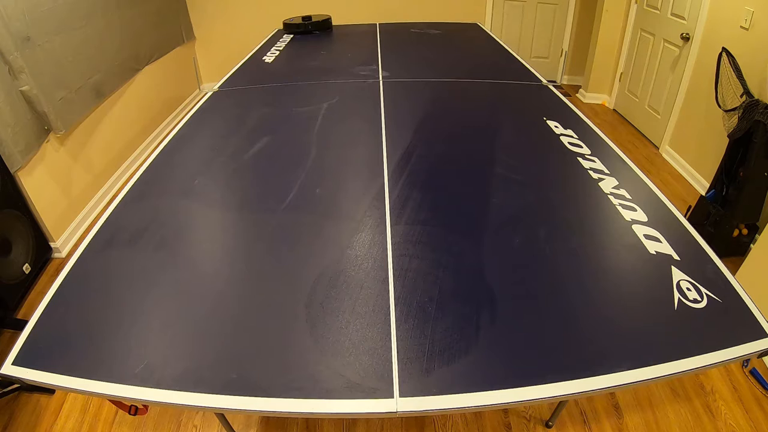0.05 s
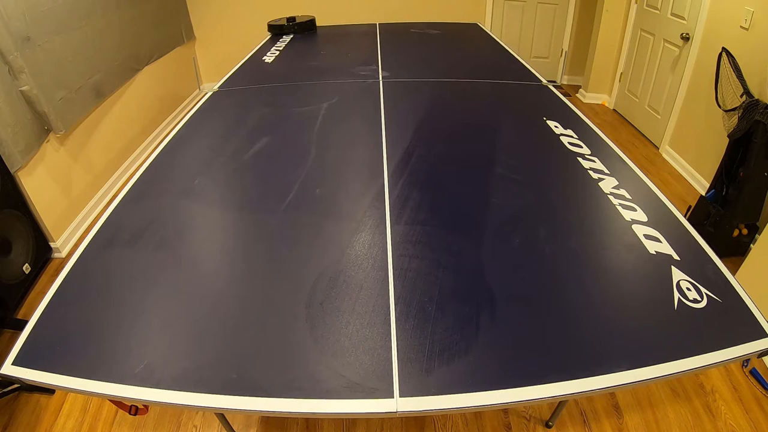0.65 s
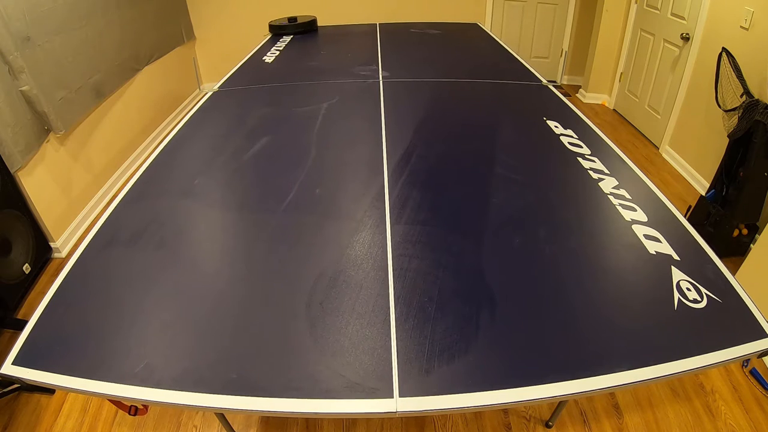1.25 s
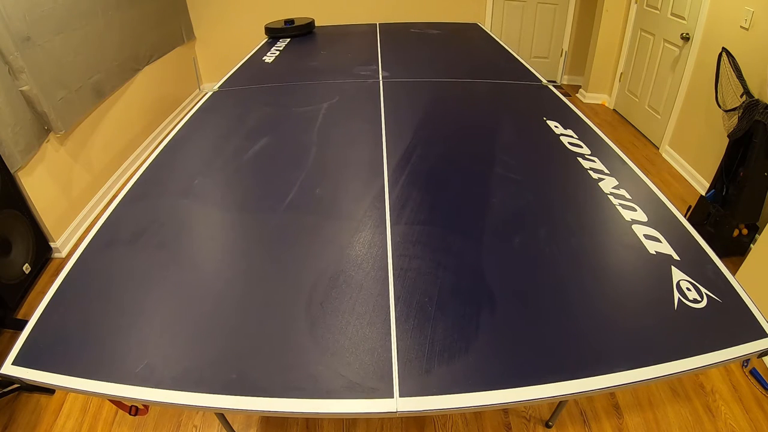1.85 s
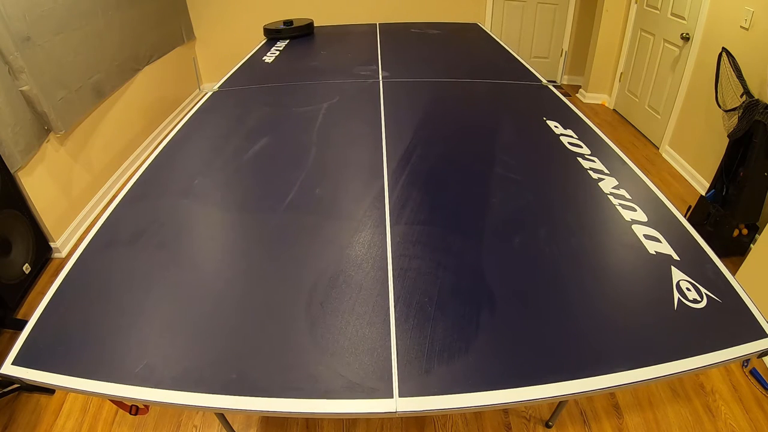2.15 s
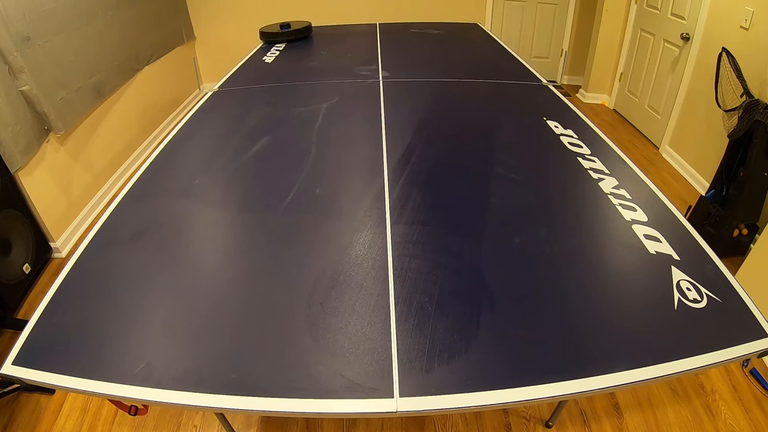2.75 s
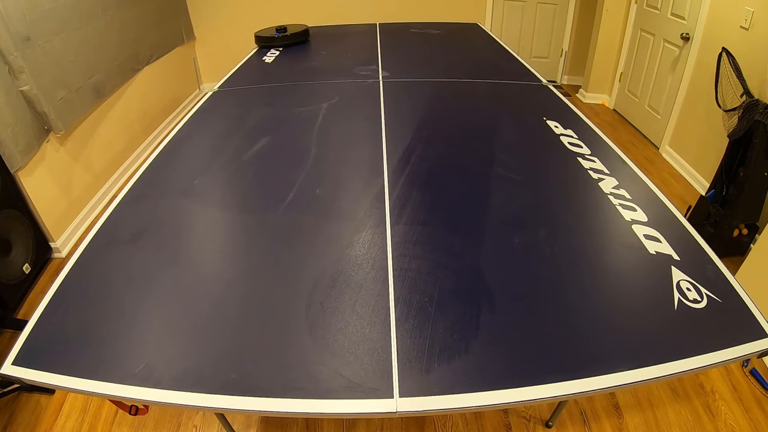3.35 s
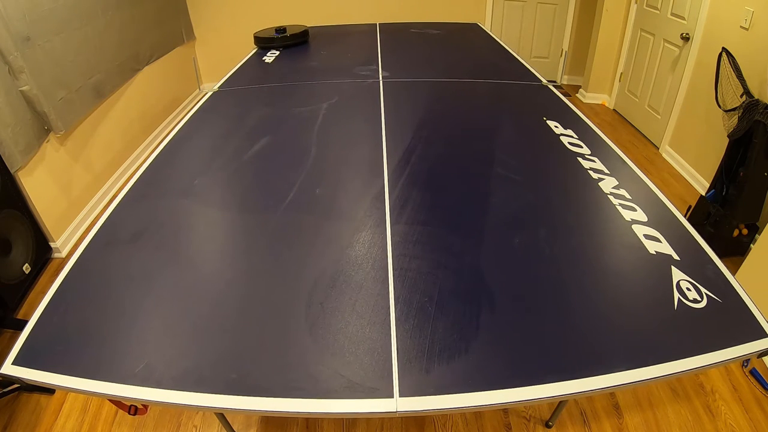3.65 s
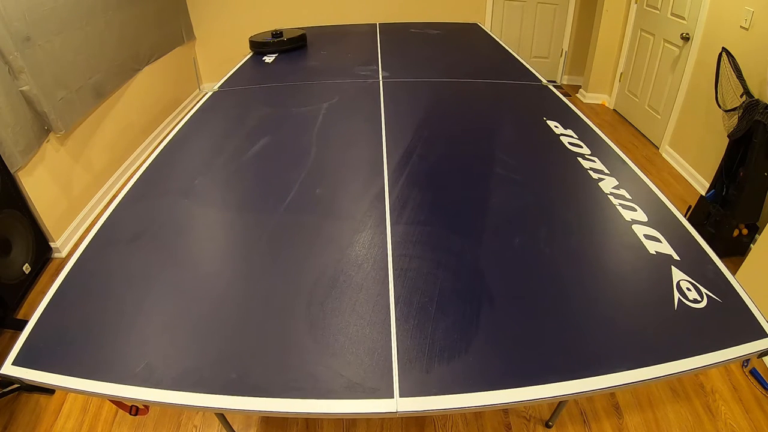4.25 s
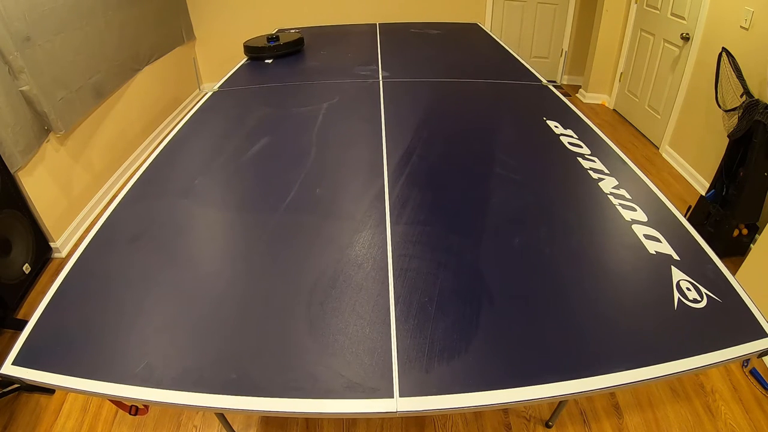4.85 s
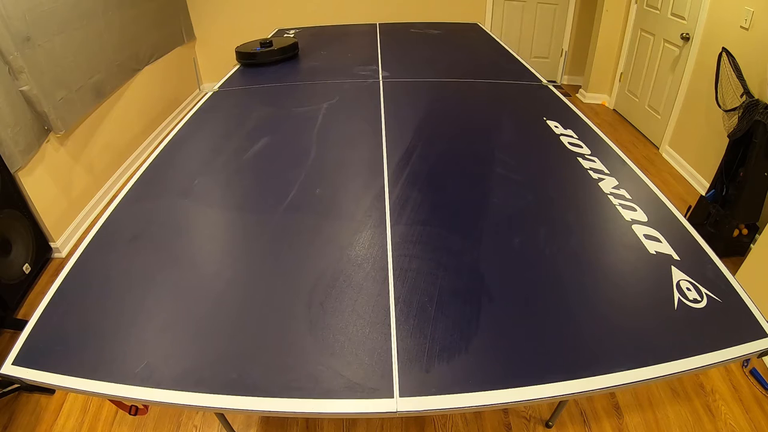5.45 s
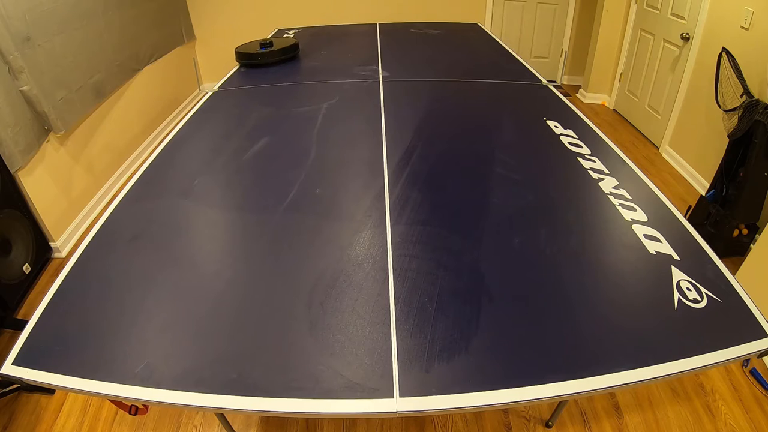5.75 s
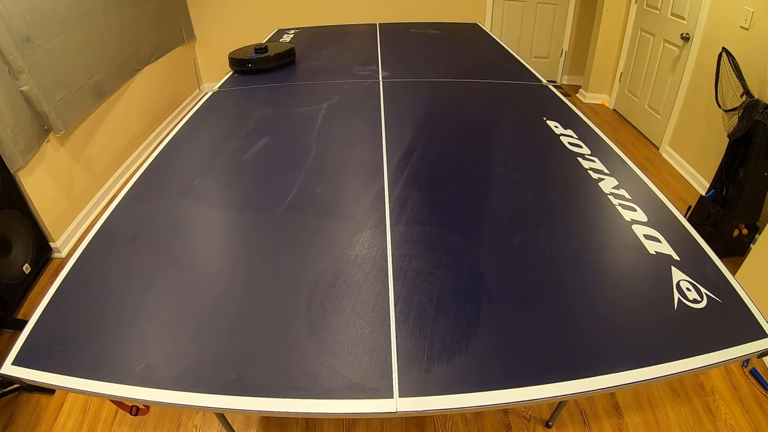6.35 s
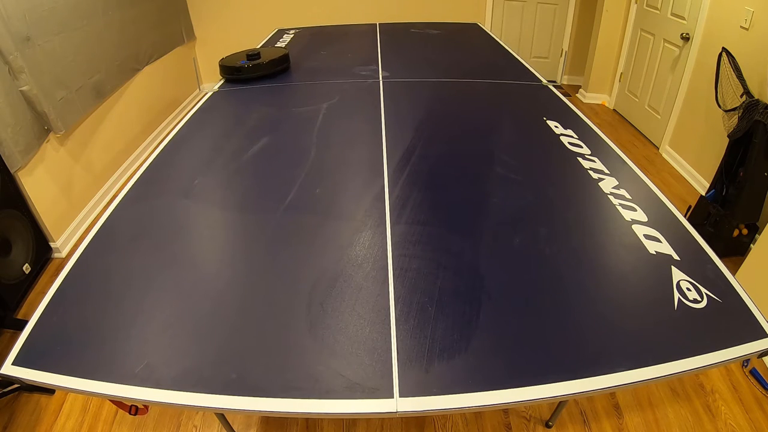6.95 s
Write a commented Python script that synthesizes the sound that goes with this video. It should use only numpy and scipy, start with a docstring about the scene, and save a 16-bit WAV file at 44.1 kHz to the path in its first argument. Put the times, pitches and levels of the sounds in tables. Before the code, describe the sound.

Steady airy whir of a robot vacuum on a tabletop, with short regular squeaks, a dull knock, faint ticks and low bumps.

```python
"""Robot vacuum on a table-tennis table

A bare room, a stereo pair, the robot creeping along the top towards the microphones. Its fan rushes
through wall echoes that slide as it moves; motors whine, gaps whistle and wheels rumble. The turning
brush squeaks about twice a second, grit ticks, and the table gives soft thumps and one knock."""
import sys
import numpy as np
from scipy import signal
from scipy.fft import rfft, irfft
from scipy.io import wavfile

SR = 44100
rng = np.random.default_rng(int(sys.argv[2]) if len(sys.argv) > 2 else 0)


def file_out(sig):
    """Save sig as 16-bit WAV at sys.argv[1]."""
    # one column per channel
    cols = np.atleast_2d(sig).T
    # limit, then scale
    lim = np.clip(cols, -1, 1)
    pcm = np.round(lim * 32767).astype(np.int16)
    wavfile.write(sys.argv[1], SR, pcm)


N = 308259
TIME = np.arange(N) / SR
FREQS = np.maximum(np.arange(N // 2 + 1) * SR / N, 1)

# rolling wheels, heard through the table: (frequency [Hz], relative level [dB])
ROLLING = [(20, -11), (55, 7.5), (100, 5.5), (170, 8), (230, -1), (380, 0), (480, -82), (700, -12.5)]


def from_db(db):
    """Decibels to gain."""
    return 10 ** (np.asarray(db) / 20)


def unit_rms(x):
    """Scale to an rms of one."""
    return x / np.sqrt(np.mean(x ** 2) + 1e-20)


def in_time(rows):
    """Each column of a timed curve, sample by sample."""
    times, *columns = np.transpose(rows)
    return [np.interp(TIME, times, column) for column in columns]


def approach(far, near, sets_off_s=0.74, arrives_s=6.13):
    """Glide from a far to a near value as the robot closes on the microphones."""
    return np.interp(TIME, [sets_off_s, arrives_s], [far, near])


def gains(points):
    """A (frequency [Hz], level [dB]) table as a gain at every frequency."""
    hz, db = np.transpose(points)
    return from_db(np.interp(np.log(FREQS), np.log(hz), db))


def shaped(x, gain):
    """Colour a sound by a gain at every frequency."""
    return irfft(rfft(x) * gain, N)


def noise(gain):
    """Coloured noise of unit rms."""
    return unit_rms(shaped(rng.standard_normal(N), gain))


def drift(rate):
    """A random wander of unit rms, changing about rate times a second."""
    return noise((FREQS > 1) / (1 + (FREQS / rate) ** 2))


def resonate(x, hz, width):
    """A resonance with unit gain at its peak."""
    r = np.exp(-np.pi * width / SR)
    poles = [1, -2 * r * np.cos(2 * np.pi * hz / SR), r * r]
    return signal.lfilter(np.array([1, 0, -1]) * (1 - r * r) / 2, poles, x + 1e-18)


def ring(clicks, hz, t60):
    """Each click starts a dying sine of its own height."""
    r, w = np.exp(-np.log(1000) / (t60 * SR)), 2 * np.pi * hz / SR
    return signal.lfilter([0, np.sin(w)], [1, -2 * r * np.cos(w), r * r], clicks + 1e-18)


def add(track, s, sound):
    """Lay a sound into a track at s seconds."""
    start = max(round(s * SR), 0)
    track[start:start + len(sound)] += sound[:N - start]


def room(x, wet_db, t60):
    """The direct sound and its diffuse tail."""
    t = TIME[:SR // 2]
    tail = rng.standard_normal(len(t)) * np.exp(-np.log(1000) * t / t60) * (t > .008)
    return x + from_db(wet_db) * signal.fftconvolve(x, tail / np.linalg.norm(tail))[:N]


def sliding_echoes(x, wall_db=-14.0, slide_s=.003, count=12):
    """Echo paths to the microphones change as the robot moves: ripples wander through the spectrum."""
    # off the top and nearby faces: (starting delay [s], final delay [s], level [dB])
    bounces = [(.00066, 0.0008, -11.5), (.00125, 0.0015, -14.5), (.00184, .00217, -13.5),
               (.00256, 0.0028, -13)]
    fine, out = signal.resample_poly(x, up=4, down=1), x.copy()
    fine_time = np.linspace(0, N / SR, len(fine), endpoint=False)
    lags = np.geomspace(.005, .03, count) * rng.uniform(.9, 1.1, count)
    walls = [(lag, lag + slide_s * rng.uniform(-1, 1), wall_db) for lag in lags]
    for first, last, db in bounces + walls:
        delay = np.linspace(first, last, N)
        out += from_db(db) * np.interp((TIME - delay) % TIME[-1], fine_time, fine)
    return out


def air(low_cut_hz=545, hiss_above_hz=3800, rush_trim_db=-0.5):
    """Turbulence in the fan and ducts; the small housing radiates almost no bass."""
    # suction: (time [s], rush level [dB], hiss level [dB])
    suction = [(0.0, -44, -40), (0.54, -44, -39.5), (1.87, -43.5, -41), (6.48, -43, -40), (6.99, -44, -40)]
    # exhaust far off, then nearer and turned: (frequency [Hz], relative level [dB])
    air_far = [(600, -7), (850, -2.5), (1050, -1), (1520, -1), (1850, -2), (2700, -5), (3700, -9.5),
               (4700, -3.5), (5600, -1), (6800, -6), (9000, -7), (10300, -10.5), (13400, -6.5),
               (15500, -11.5)]
    air_near = [(600, -4.5), (820, -8), (1020, 0), (1400, -0.5), (1750, -4.5), (2400, -4.5), (3900, -10.5),
                (4700, -6), (5600, -2.5), (6800, -5.5), (9000, -9), (10300, -11.5), (13400, -9),
                (15500, -14.5)]
    # hollows of the housing: (frequency [Hz], width [Hz], lift [dB])
    housing = [(781, 18, 4), (1217, 45, 3), (1478, 72, 1), (4340, 370, -5.5), (5640, 600, 1),
               (11360, 420, 3)]
    rush_db, hiss_db = in_time(suction)
    hollows = from_db(sum(db / (1 + (2 * (FREQS - hz) / width) ** 2) for hz, width, db in housing))
    body = hollows / np.sqrt(1 + (low_cut_hz / FREQS) ** 20)
    nearness = approach(0, 0.98)
    far = np.sqrt(1 - nearness) * noise(body * gains(air_far))
    near = np.sqrt(nearness) * noise(body * gains(air_near))
    flow = sliding_echoes(far + near)
    hiss = shaped(flow, 1 / (1 + (hiss_above_hz / FREQS) ** 10))
    return from_db(rush_db + rush_trim_db) * unit_rms(flow - hiss) + from_db(hiss_db) * unit_rms(hiss)


def tone(hz, wander, waver_db):
    """One partial of a motor, slightly unsteady in speed and strength; unit rms."""
    phase = 2 * np.pi * np.cumsum(hz * (1 + wander * drift(8))) / SR
    return unit_rms(np.sin(phase) * from_db(waver_db * drift(6)))


def motors(brush_hz=560, fan_hz=927):
    """The brush motor drones, and whines louder as it nears; the fan holds a steadier note."""
    # the drone swells and fades as the robot moves through the room's standing waves:
    # (time [s], relative level [dB])
    drone = [(0.0, -57), (0.8, -66.5), (1.3, -51), (1.5, -75), (1.9, -63.2), (3.4, -68.5), (3.6, -55.6),
             (3.7, -64.2), (4.1, -53.5), (4.3, -63.5), (5.1, -52), (6.5, -63.5), (6.98, -58.7)]
    drone_db, = in_time(drone)
    brush = from_db(drone_db + 2.0) * tone(brush_hz, wander=0.0055, waver_db=3.5)
    brush += from_db(approach(-69.5, -55.5)) * tone(6 * brush_hz, wander=0.0018, waver_db=2.5)
    fan = from_db(-55.5) * tone(fan_hz, wander=0.0011, waver_db=2.0)
    fan += from_db(-67) * tone(3 * fan_hz, wander=0.0015, waver_db=6)
    fan += from_db(-56.5) * tone(8 * fan_hz, wander=0.00158, waver_db=4.5)
    return brush + fan


def singing(hz, width_hz, stray=.007, strays_per_s=1.5):
    """A narrow band of noise whose centre wanders; unit rms."""
    centre = hz * (1 + stray * drift(strays_per_s))
    return unit_rms(drift(width_hz) * np.sin(2 * np.pi * np.cumsum(centre) / SR))


def whistle(swell_db=2.5, swells_per_s=4.3):
    """Air sings at narrow gaps, swelling and fading by chance, with a few spurts of high hiss."""
    # gaps in the shell: (pitch [Hz], width [Hz], far level [dB], near level [dB])
    gaps = [(1484, 7.1, -53, -68), (2356, 50, -77, -55.5), (5595, 90, -62, -53.5), (13570, 150, -54.5, -57)]
    # spurts of hiss: (time [s], length [s], level [dB])
    spurts = [(2.95, 0.3, -51), (3.44, 0.29, -49), (5.0, 0.36, -50)]
    out, spurting = np.zeros(N), np.zeros(N)
    for hz, width, far_db, near_db in gaps:
        note = singing(hz, width) * from_db(swell_db * drift(swells_per_s))
        out += from_db(approach(far_db, near_db)) * unit_rms(note)
    for s, length, db in spurts:
        add(spurting, s, from_db(db) * np.sin(np.pi * np.minimum(TIME[:SR] / length, 1)))
    return out + spurting * singing(hz=13500, width_hz=160)


def wheels(rumble_db=-73, lumpy_db=5, hum_db=-77, hum_hz=150):
    """Uneven rolling rumbles in the table, with the low hum of the drive."""
    rumble = noise(gains(ROLLING)) * from_db(rumble_db + lumpy_db * drift(26))
    return rumble + from_db(hum_db) * tone(hum_hz, wander=0.028, waver_db=4.5)


def table_push(force, hz, spread=0.38, dull_hz=480):
    """A scuffing push around one pitch shakes the top, as strongly as a sine under the same force."""
    # modes of the top: (frequency [Hz], width [Hz], relative level [dB])
    modes = [(63, 22.6, 16.5), (124, 28, 7), (199, 31, -12), (262, 67, 2), (345, 30, -39), (486, 400, -1)]
    scuff = force * rng.standard_normal(len(force))
    push = resonate(resonate(scuff, hz, spread * hz), hz, width=162)
    top = sum(from_db(db) * resonate(push, mode_hz, width) for mode_hz, width, db in modes)
    top = signal.sosfilt(signal.butter(4, dull_hz, fs=SR, output="sos"), top)
    return unit_rms(top) * np.sqrt(np.mean(force ** 2) / 2)


def thumps(trim_db=-1.5, swell_s=0.013, hold_s=0.0072, dying_s=0.017):
    """Each thump or faint wheel jolt pushes the top; the weight then settles and rocks the frame."""
    # soft thumps in the table: (time [s], relative level [dB], centre [Hz])
    pushes = [(.091, -51, 58), (.188, -45, 96), (.258, -44, 61), (0.901, -38, 117), (1.244, -42, 151.5),
              (3.488, -50, 84.5), (4.73, -32.5, 240), (4.766, -26, 255), (4.785, -35, 121.5),
              (5.26, -45.5, 151), (5.327, -34, 113), (5.516, -40, 107.6), (5.591, -40.5, 120.8),
              (5.709, -28, 127), (5.775, -31, 123.5), (5.861, -41, 134.6), (6.031, -30.5, 274),
              (6.293, -45, 235), (6.482, -32.5, 196.6), (6.68, -27, 173), (6.888, -52, 60)]
    jolts_per_s, jolt_db, jolt_spread_db, jolt_hz = 2.5, -59, 3, 105
    settle_s, settle_db, settle_hz = 0.01707, -13, 118
    frame_db, frame_hz = -17, 55
    out, t = np.zeros(N), TIME[:SR // 3]
    force = np.minimum(t / swell_s, 1) * np.exp(-np.maximum(t - swell_s - hold_s, 0) / dying_s)
    frame = from_db(frame_db) * force * np.sin(2 * np.pi * frame_hz * t)
    jolts = [(when * TIME[-1], jolt_db + jolt_spread_db * (2 * size - 1), jolt_hz)
             for when, size in rng.random((round(jolts_per_s * TIME[-1]), 2))]
    for s, db, hz in pushes + jolts:
        gain = from_db(db + trim_db)
        add(out, s - .004, gain * table_push(force, hz))
        settling = from_db(settle_db) * table_push(force, settle_hz)
        add(out, min(s + settle_s, TIME[-1]), gain * (settling + frame))
    return out


def squeaks(sharp=.14, settle_s=0.0076, judder=.5, judder_hz=80, bend=.035, low_cut_hz=490):
    """The brush sticks and slips on the top: a near sine that starts sharp and judders, over a scrape."""
    # brush squeaks: (time [s], relative level [dB], pitch [Hz], length [s])
    slips = [(0.283, -25.5, 558, 0.048), (0.711, -27, 619, 0.042), (1.014, -33, 626, 0.024),
             (1.486, -34.5, 652, 0.029), (2.12, -30, 642, .046), (2.534, -29, 617, 0.047),
             (3.106, -36.5, 630, 0.056), (3.591, -29, 628, 0.033), (4.172, -31, 625, 0.033),
             (4.572, -30, 629, 0.041), (5.179, -28.5, 617, 0.037), (5.611, -29, 599, 0.04),
             (6.176, -27.5, 607, 0.033), (6.637, -27.5, 608, 0.036)]
    second_db, third_db, scrape_db, rasp_db, thud_db = -23, -25, -16, -23, -31
    squeal, load, t = np.zeros(N), np.zeros(N), TIME[:SR // 8]
    shake = drift(42)
    for s, db, hz, length in slips:
        # the bristles catch and release a few times, more deeply as they let go
        catch_hz = judder_hz * (1 + 0.44 * np.interp(s + t, TIME, shake))
        catches = np.cumsum(catch_hz) / SR + rng.random()
        grip = np.sin(2 * np.pi * catches) * np.minimum(2 * t / length, 1)
        pitch = hz * (1 + sharp * np.exp(-t / settle_s) - bend * grip)
        phase = 2 * np.pi * np.cumsum(pitch) / SR
        pressure = from_db(db) * np.interp(t / length, [0, .18, .75, 1.1, 2], [.14, .81, .63, .081, .0099])
        overtones = from_db(second_db) * np.sin(2 * phase) + from_db(third_db) * np.sin(3 * phase)
        add(squeal, s, pressure * (1 + judder * grip) * (np.sin(phase) + overtones))
        add(load, s, pressure)
    scrape = resonate(resonate(rng.standard_normal(N), hz=746, width=180), hz=700, width=220)
    squeal += from_db(scrape_db) * load * unit_rms(scrape)
    squeal += from_db(rasp_db) * load * singing(hz=1250, width_hz=360)
    # the housing radiates almost no bass; only a faint thud passes through the table
    squeal = signal.sosfilt(signal.butter(8, low_cut_hz, "high", fs=SR, output="sos"), squeal)
    thud = from_db(thud_db) * load * noise(gains(ROLLING))
    return room(squeal + thud, wet_db=-13, t60=.22)


def knock():
    """A few quick contacts ring the table in one dull rattle."""
    # contacts: (time [s], relative level [dB])
    contacts = [(1.571, -8.5), (1.5764, -3.5), (1.582, -5), (1.589, 3), (1.5939, 2), (1.602, -1),
                (1.61, -12)]
    # what they set ringing: (frequency [Hz], relative level [dB], t60 [s])
    modes = [(281, -29.5, 0.047), (345, -29.5, 0.031), (484, -24.5, 0.026), (680, -23.5, 0.015),
             (844, -30, 0.034), (980, -23, 0.013), (1214, -29.5, 0.019)]
    clicks = np.zeros(N)
    for s, db in contacts:
        add(clicks, s, from_db([db]))
    rings = sum((-1) ** k * from_db(db) * ring(clicks, hz, t60) for k, (hz, db, t60) in enumerate(modes))
    return room(rings, wet_db=-6.0, t60=0.055)


def grit(trim_db=-4.5, dying_s=0.015):
    """Crumbs hit the plastic shell with short bright ticks."""
    # hits on the shell: (time [s], relative level [dB])
    hits = [(2.9387, -33), (3.0562, -30), (3.162, -35.5), (3.2334, -35), (3.299, -34.5), (3.3583, -35),
            (3.396, -38), (3.4494, -37.5), (3.5758, -39), (6.183, -32.5)]
    # colour of a tick: (frequency [Hz], relative level [dB])
    colour = [(1200, -49), (2400, -2.5), (3100, -2), (4200, 4), (6500, -1), (9000, -9), (15000, -33)]
    blows = np.zeros(N)
    for s, db in hits:
        add(blows, s, from_db(db + trim_db) * np.exp(-TIME[:SR // 8] / dying_s))
    return room(blows * noise(gains(colour)), wet_db=-4, t60=0.22)


def scene():
    """At the stereo pair: the robot in the middle, sound from the walls in the side signal."""
    # stereo width: (frequency [Hz], side gain [dB])
    width = [(40, 6), (130, -2), (300, 1), (600, -12.5), (1500, -29), (2100, -10), (2800, -4.5),
             (5000, -3.5), (10000, -5.5), (14000, -9)]
    # balance of the pair: (frequency [Hz], left minus right [dB])
    balance = [(60, -1.5), (130, 2), (290, 0.8), (640, 0.78), (1410, -0.5), (3100, 3), (6820, 1.2),
               (15000, 1.0)]
    whine = motors() + whistle()
    contacts = squeaks() + thumps() + knock() + wheels()
    mid = air() + grit() + whine + contacts
    around = air() + grit() + room(contacts, wet_db=-9, t60=0.046) - contacts
    around += shaped(whine, 1j)  # standing waves put the steady tones out of phase across the pair
    side, lean = shaped(around, gains(width)), np.sqrt(gains(balance))
    return np.array([shaped(mid + side, lean), shaped(mid - side, 1 / lean)])


def record(dry, cutoff_hz=15750):
    """A steep low-pass takes off the highest treble."""
    return signal.sosfilt(signal.ellip(12, .1, 80, cutoff_hz, fs=SR, output="sos"), dry)


dry = scene()
out = record(dry)
file_out(out)
```